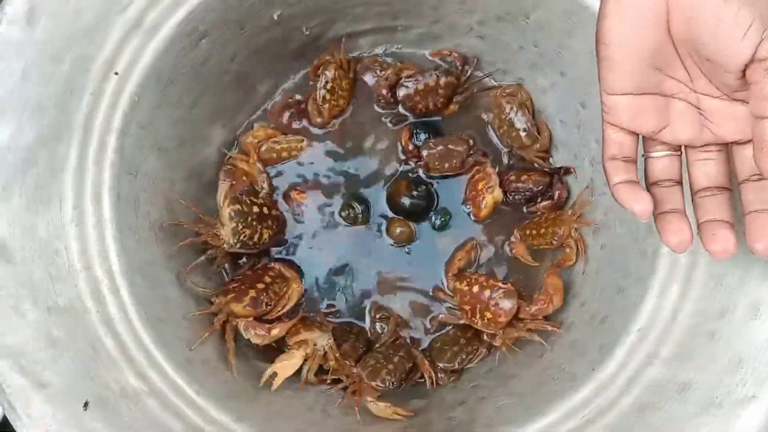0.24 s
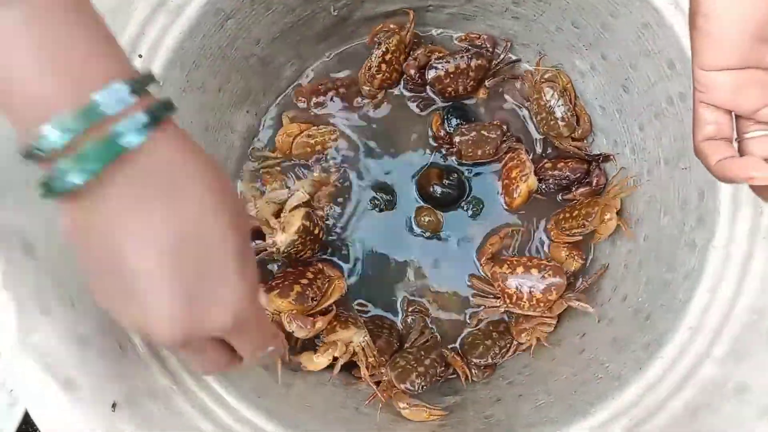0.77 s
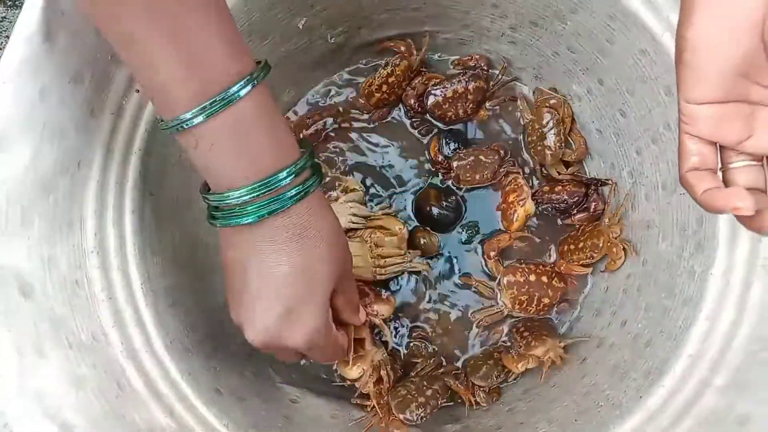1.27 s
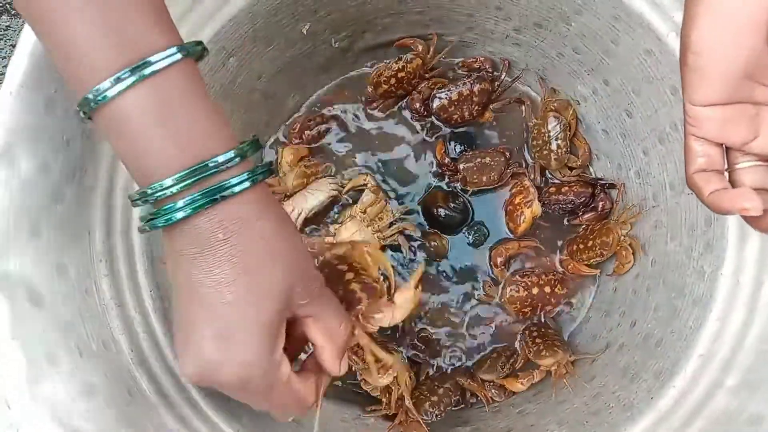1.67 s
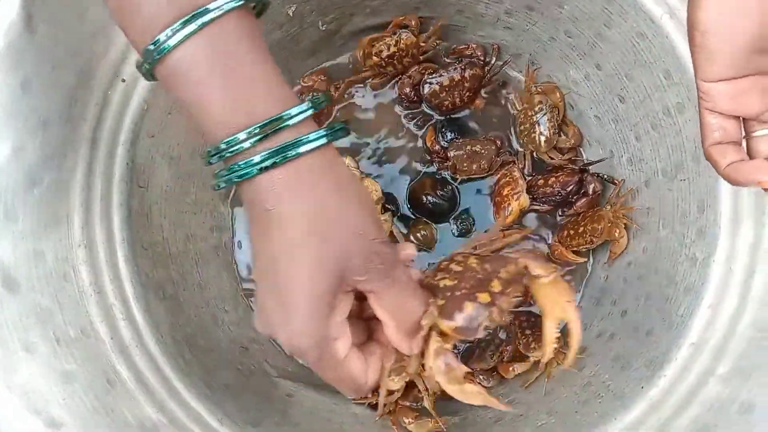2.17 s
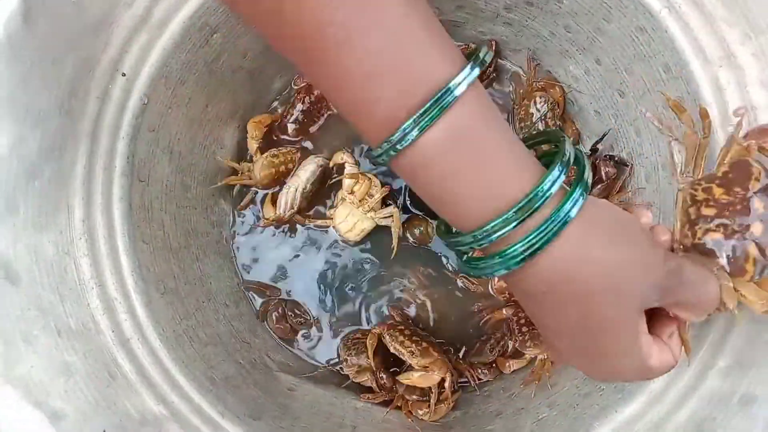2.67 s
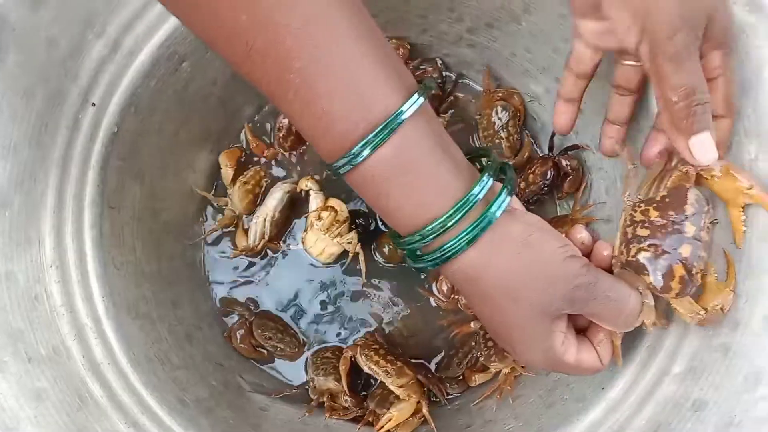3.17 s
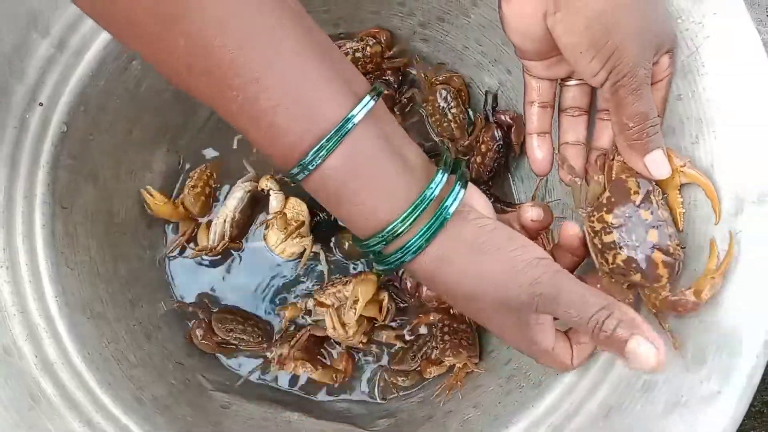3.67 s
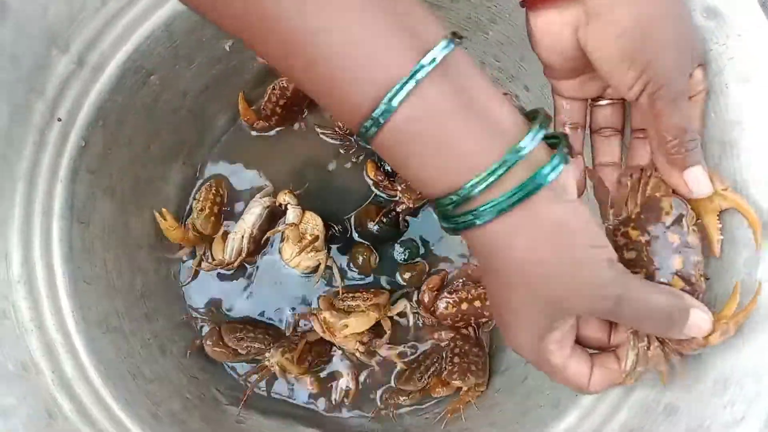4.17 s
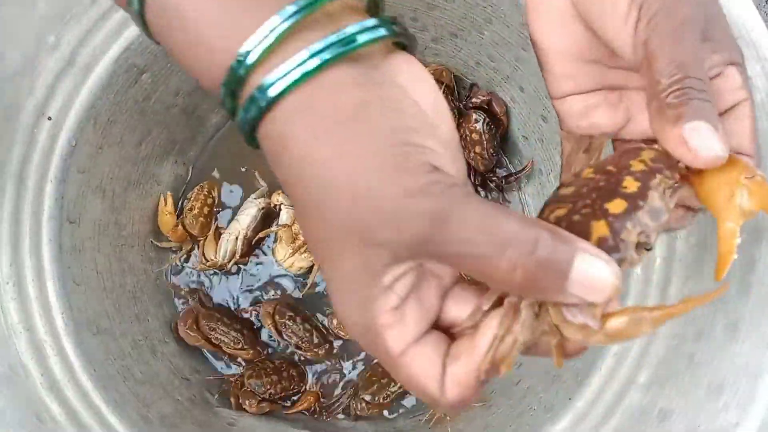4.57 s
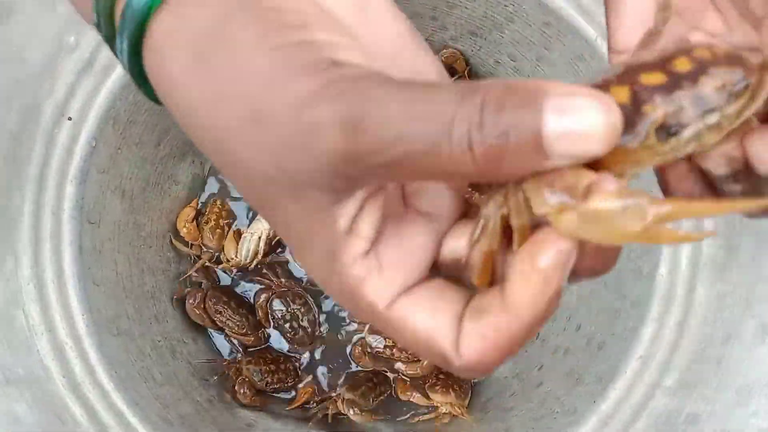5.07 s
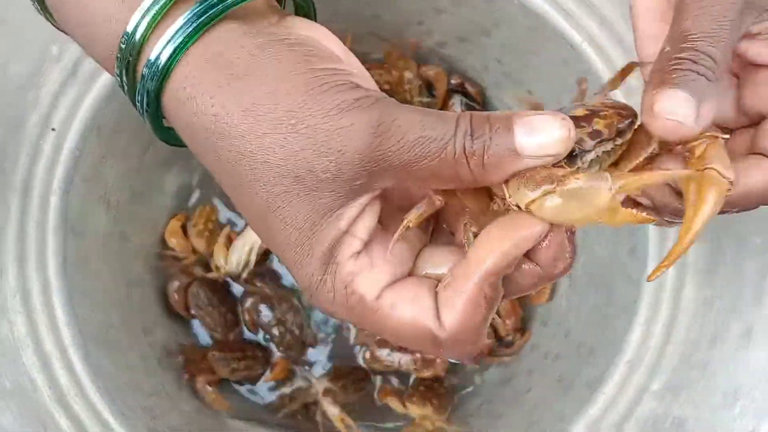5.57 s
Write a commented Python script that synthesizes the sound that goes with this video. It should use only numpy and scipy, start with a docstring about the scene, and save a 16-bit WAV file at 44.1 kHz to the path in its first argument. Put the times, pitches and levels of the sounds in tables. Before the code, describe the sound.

Many live crabs scrabble in a shallow-water metal basin: continuous fine ticking and scratching, with irregular hard claw and shell knocks that ring briefly. Around one to two seconds a hand stirs the water, giving hollow slosh and low plops; afterwards the clatter dominates. Close small microphone above, brushed by soft low air puffs, over very faint hiss with little room echo.

```python
"""Crabs in a metal basin

Live crabs scrabble in shallow water: leg ticks, scrapes and harder claw and shell knocks are noise
bursts and dying sines coloured by the basin wall. Plops, fizz and short wall notes are sines that
climb slightly in pitch. Water sloshing round a hand is noise ringing in the basin's hollow; puffs of
air on a small microphone held above are lumpy low noise, over a faint steady hiss.
"""
import sys
import numpy as np
from scipy import signal
from scipy.io import wavfile
from scipy.ndimage import uniform_filter1d, minimum_filter1d

SR = 44100
rng = np.random.default_rng(int(sys.argv[2]) if len(sys.argv) > 2 else 0)


def volts_from_db(level):
    """Convert decibel levels to linear amplitude ratios."""
    exponent = np.asarray(level, float) / 20
    return 10 ** exponent


def store_wav(level_fs):
    """Save 16-bit WAV to argv[1]."""
    pcm = np.round(np.clip(np.atleast_2d(level_fs), -1, 1) * 32767)
    wavfile.write(sys.argv[1], SR, pcm.T.astype(np.int16))


N = 257103  # length in samples

# long modes of the basin wall, before random detuning: pitch_hz [Hz], level_db [dB], t60_s [s]
WALL_MODES = [(678, -13, 0.51), (776.6, -2, 0.19), (874, -1.5, 0.27), (1022, 1, 0.21), (1125, -6, 0.12),
              (1281, 3.5, 0.078), (1385, 2.5, 0.11), (1530, 1.5, 0.095)]


def evened(x):
    """Scales a signal to an rms of 1."""
    return x / np.sqrt(np.mean(x ** 2) + 1e-20)


def causal(points, size=4096):
    """Minimum-phase response of energy 1 with the given colour: the sound starts at once, then rings."""
    point_hz, point_db = np.transpose(points)
    hz = abs(np.fft.fftfreq(size, 1 / SR))
    colour_db = np.interp(np.log(hz + 1), np.log(point_hz + 1), point_db)
    log_gain = np.log(volts_from_db(np.maximum(colour_db, -70)))
    # the Hilbert transform of the log gain gives the minimum phase
    taps = np.fft.ifft(np.exp(log_gain - 1j * signal.hilbert(log_gain).imag)).real[:size // 2]
    return taps / np.linalg.norm(taps)


def add(mix, start_s, sound):
    """Mixes a sound in at its start time, cut off at the end of the mix."""
    part = mix[:, round(start_s * SR):][:, :sound.shape[1]]
    part += sound[:, :part.shape[1]]


def rattle(t60, rise_s, count=6000):
    """A blow scatters round the wall: dense noise that starts fast and dies away."""
    t = np.arange(count) / SR
    return rng.standard_normal(count) * (1 - np.exp(-t / rise_s)) * volts_from_db(-60 * t / t60)


def basin(drive):
    """The wall colours each of the low, middle and high drives with its own resonant response."""
    # wall colour in three parts: frequency_hz [Hz], level_db [dB per Hz, relative]
    low_colour = [(290, -54), (500, -21), (720, -9.5), (1040, 1), (1640, -2), (1900, 2), (2470, -12),
                  (4180, -120)]
    mid_colour = [(1060, -68), (1800, -10), (2240, -6), (2500, 1), (2680, 1.5), (3280, -3), (3910, -14.5),
                  (4300, -16), (5590, -75), (9460, -120)]
    high_colour = [(2470, -87), (4300, -8), (5000, -1.5), (6010, -0.5), (6930, -2.5), (9040, -18),
                   (10200, -12), (12900, -21), (15400, -16.5)]
    colours = (low_colour, mid_colour, high_colour)
    return sum(signal.oaconvolve(x, causal(c))[:N] for x, c in zip(drive, colours))


def with_ring(tail, ring, ring_db):
    """Adds a ring to a rattle, at a level relative to the rattle's energy."""
    return tail + volts_from_db(ring_db) * ring * np.linalg.norm(tail) / np.linalg.norm(ring)


def spotted(tail, lo_hz, hi_hz, t60, ring_db, count):
    """Adds the few modes that happen to be strong at the spot struck."""
    t = np.arange(len(tail)) / SR
    place, phase = rng.random((2, count, 1))
    hz = lo_hz * (hi_hz / lo_hz) ** place
    rings = np.sin(2 * np.pi * (hz * t + phase)).sum(0)
    rings = rings * volts_from_db(-60 * t / t60)
    return with_ring(tail, rings, ring_db)


def wall_note(tail, mode, ring_db):
    """Adds one long mode of the wall, detuned a little at random."""
    hz, mode_db, t60 = mode
    t = np.arange(len(tail)) / SR
    detune = rng.uniform(0.98, 1.03)
    ring = np.sin(2 * np.pi * hz * detune * t) * volts_from_db(-60 * t / t60)
    return with_ring(tail, ring, ring_db + mode_db)


def rising_notes(rows, glide, rise_s):
    """Each note is a dying sine whose pitch climbs a little; used for bubbles, plops and wall notes."""
    out, t = np.zeros((1, N)), np.arange(SR // 4) / SR
    for start_s, db, hz, t60 in rows:
        shape = (1 - np.exp(-t / rise_s)) * volts_from_db(db - 60 * t / np.clip(t60, 0.015, 0.4))
        # the pitch climbs by twice glide, as a share of its start, per second
        note = np.sin(2 * np.pi * hz * t * (1 + glide * t))
        add(out, start_s, (shape * note)[None])
    return out[0]


def activity():
    """Slow level of the legs in dB, which dips briefly as they ease off."""
    # how busy the legs on the wall are: time_s [s], level_db [dB]
    busy_levels = [(0, -25.5), (.3, -30), (.55, -24.5), (.82, -24.5), (1.25, -25.5), (1.9, -26.5),
                   (2.15, -26), (2.42, -28), (2.68, -28.5), (2.95, -28.5), (3.15, -24.5), (3.45, -28.5),
                   (3.65, -23), (4.0, -26), (4.5, -24), (4.75, -23.5), (5.2, -24.5), (5.83, -25)]
    # brief dips as the legs ease off: middle_s [s], depth_db [dB], half_length_s [s]
    pauses = [(0.123, -5, 0.053), (0.344, -0.5, 0.026), (1.552, -3, 0.017), (2.31, -1, 0.012),
              (2.807, -3.5, 0.046), (3.269, -3, 0.014), (4.167, -4, 0.046), (5.061, -4, 0.0089),
              (5.468, -6, 0.006), (5.677, -3, .025)]
    t = np.arange(N) / SR
    time_s, level_db = np.transpose(busy_levels)
    dips = sum(db * np.exp(-((t - s) / half) ** 4) for s, db, half in pauses)
    return np.interp(t, time_s, level_db) + dips


def room():
    """Faint steady hiss: noise through a fixed colour."""
    # hiss colour: frequency_hz [Hz], level_db [dB per Hz, relative]
    hiss_colour = [(18, -76), (30, -39.5), (1630, -7), (2680, 5), (4190, -12.5), (6380, -2), (16000, -33.5)]
    return volts_from_db(-35) * signal.oaconvolve(rng.standard_normal(N), causal(hiss_colour))[:N]


def puffs_of_air(lumps):
    """Air brushing the microphone: low noise of lumpy level that swells with each puff."""
    # colour of the puffs: frequency_hz [Hz], level_db [dB per Hz, relative]
    puff_colour = [(15, -56), (40, -28), (75, 0.5), (140, -7), (230, -16.5), (350, -21), (480, -71)]
    # puffs: middle_s [s], level_db [dB], half_length_s [s]
    puff_times = [(0.015, -48, 0.032), (0.294, -31, 0.021), (0.88, -42.5, 0.056), (1.12, -55, 0.14),
                  (1.312, -36.5, 0.077), (1.75, -28.5, 0.03), (2.043, -32, 0.018), (2.455, -62, 0.068),
                  (2.798, -45, 0.047), (3.98, -51, 0.065), (4.203, -52.5, 0.096), (4.352, -60.5, 0.074),
                  (4.533, -62.5, 0.1)]
    t = np.arange(N) / SR
    lumpy = rng.standard_normal(N) * volts_from_db(3.0 * lumps)
    puff = signal.oaconvolve(lumpy, causal(puff_colour, size=16384))[:N]
    swells = sum(volts_from_db(db) * np.exp(-((t - s) / half) ** 2) for s, db, half in puff_times)
    return (volts_from_db(-66.5) + swells) * evened(puff)


def sloshing(lumps):
    """Water slaps stir the basin's hollow: lumpy noise bursts ring its low air and water modes."""
    # slaps: start_s [s], level_db [dB]
    slaps = [(0.876, -41), (1.04, -38.5), (1.098, -40), (1.169, -32), (1.284, -29), (1.359, -31),
             (1.425, -39), (1.485, -35.5), (1.58, -36), (1.779, -35), (1.925, -45.5), (2.37, -41.5),
             (2.479, -46), (2.574, -53), (3.315, -56), (3.709, -40.5), (3.782, -48), (4.316, -53),
             (4.44, -48), (4.484, -45), (4.707, -49), (4.851, -43), (4.938, -41.5), (5.121, -50),
             (5.219, -59), (5.397, -44.5)]
    # modes of air and water: pitch_hz [Hz], width_hz [Hz, widened 1.5 times below], level_db [dB]
    hollow_modes = [(304, 34, -25), (344.6, 67, 21.5), (696, 147, 26)]
    rise_s, t60_s, calm_db = 0.0041, 0.35, -64.5
    water, t = np.full((1, N), volts_from_db(calm_db)), np.arange(SR // 2) / SR
    for start_s, db in slaps:
        add(water, start_s, ((1 - np.exp(-t / rise_s)) * volts_from_db(db - 60 * t / t60_s))[None])
    # the puffs' lumps, shifted by half the length
    stir = rng.standard_normal(N) * water[0] * volts_from_db(0.93 * np.roll(lumps, N // 2))
    t = t[:SR // 8]
    ring = sum(volts_from_db(db) * t * np.exp(-np.pi * width * 1.5 * t) * np.sin(2 * np.pi * hz * t)
               for hz, width, db in hollow_modes)
    return signal.oaconvolve(stir, ring / np.linalg.norm(ring))[:N]


def air_and_water():
    """Puffs and sloshing, both made uneven by one slow random curve."""
    lumps = evened(uniform_filter1d(rng.standard_normal(N), size=600))
    return puffs_of_air(lumps) + sloshing(lumps)


def plops_and_wall_notes():
    """Low plops in the water below 350 Hz, and short higher notes of the ringing wall."""
    # plops and wall notes: start_s [s], level_db [dB], pitch_hz [Hz at the start]
    note_rows = [(0.742, -17.5, 960), (1.211, -22, 297), (1.328, -15, 331), (1.655, -15.5, 1320),
                 (1.672, -15, 287), (1.726, -13.5, 268), (1.733, -16, 147), (2.043, -21.5, 1038),
                 (2.187, -27, 1290), (3.917, -18, 1110), (4.39, -31, 1300), (2.865, -26, 1234),
                 (4.172, -23, 815), (5.128, -43, 800), (2.95, -27.5, 1030), (2.612, -33, 1270),
                 (4.654, -21, 1470)]
    t60_s = 0.073
    return rising_notes([(*row, t60_s) for row in note_rows], glide=0.61, rise_s=0.0011)


def fizz():
    """Small bubbles stirred up at random, each with its own note, louder when the legs are busy."""
    bubbles_per_s, lo_hz, hi_hz = 28, 741.7, 1615
    when, size, pitch, life = rng.random((round(bubbles_per_s * N / SR), 4)).T
    hz = lo_hz * (hi_hz / lo_hz) ** pitch
    db = activity()[(when * N).astype(int)] - 10 + 9 * size ** 2
    t60_s = 0.13 * (0.2 + life)
    return rising_notes(zip(when * N / SR, db, hz, t60_s), glide=0.24, rise_s=0.0053)


def tips():
    """Leg tips tick the wall: short dry treble, some ticks placed, others random and louder with activity."""
    # placed ticks: start_s [s], level_db [dB]
    placed_ticks = [(0.683, -22), (0.9102, -12), (1.035, -21), (1.354, -22), (1.494, -17), (2.6617, -17.5),
                    (3.2206, -13), (3.6017, -20.5), (3.959, -18), (4.422, -14.5), (5.088, -15.5),
                    (5.1856, -17), (5.3862, -19.5)]
    ticks_per_s = 60
    size_db = 2.14 * np.minimum(rng.exponential(1, N), 3)
    train = volts_from_db(activity() - 8.5 + size_db) * (rng.random(N) < ticks_per_s / SR)
    for start_s, db in placed_ticks:
        train[round(start_s * SR)] = volts_from_db(db)
    kind = rng.integers(0, 6, N)  # six different tick sounds
    ticks = sum(signal.oaconvolve(train * (kind == k), rattle(0.036, 0.00063, count=2000))[:N]
                for k in range(6))
    return signal.oaconvolve(ticks, causal([(3000, -19.5), (6000, 21.0), (15500, 9.0)]))[:N]


def scrapes():
    """A shell dragged along the wall: gritty noise that starts quickly, holds as it slides, then rings out."""
    # scrapes: start_s [s], level_db [dB], length_s [s]
    scrape_rows = [(0.8, -21, 0.032), (0.834, -22.5, 0.038), (0.984, -26, 0.013), (1.62, -23, 0.037),
                   (1.841, -29, 0.025), (2.08, -27, 0.091), (2.182, -27.5, 0.045), (3.284, -25, 0.054),
                   (3.694, -27.5, 0.072), (3.942, -23, 0.021), (4.057, -22, 0.014), (4.199, -32, 0.05),
                   (4.663, -23.5, 0.062), (4.839, -23.5, 0.025), (5.009, -21, 0.015)]
    rise_s, t60_s = 0.0013, 0.12
    balance = volts_from_db(np.array([[-12], [0], [-7]]))  # low, middle, high
    drive, t = np.zeros((3, N)), np.arange(9000) / SR
    for start_s, db, length_s in scrape_rows:
        shape = (1 - np.exp(-t / rise_s)) * volts_from_db(db - 60 * np.maximum(t - length_s, 0) / t60_s)
        grit = volts_from_db(2.7 * evened(uniform_filter1d(rng.standard_normal(len(t)), size=200)))
        add(drive, start_s, balance * shape * grit * rng.standard_normal((3, len(t))))
    return basin(drive)


def legs():
    """Random ticks of many sizes, in flurries; each crab stays a moment on one spot with its own ring."""
    ticks_per_s, moves_per_s, crabs, spots = 800, 40, 4, 24
    flurry = evened(uniform_filter1d(uniform_filter1d(rng.standard_normal(N), size=500), size=500))
    struck = rng.random(N) < ticks_per_s / SR
    size = volts_from_db(2.85 * np.minimum(rng.exponential(1, N), 4) + 0.21 * flurry) * struck
    # every crab shifts its hold at random; each tick belongs to a random crab
    moves = np.cumsum(rng.random((crabs, N)) < moves_per_s / SR, axis=1)
    holds = rng.integers(0, spots, (crabs, 400))
    crab = rng.integers(0, crabs, N)
    spot = holds[crab, moves[crab, np.arange(N)]]
    drive = np.zeros((3, N))
    for k in range(spots):
        lean_db = np.array([3.1, 1.4, 1.6]) * rng.standard_normal(3)
        low = wall_note(rattle(0.07, 0.006), WALL_MODES[k % len(WALL_MODES)], -11.5)
        mid = spotted(rattle(0.052, 0.00029), 1901, 4000, 0.15, -15.5, count=3)
        high = spotted(rattle(0.062, 0.00013), 4492, 12990, 0.049, -8.5, count=4)
        for part, tail, db in zip(drive, (low, mid, high), lean_db):
            part += volts_from_db(db) * signal.oaconvolve(size * (spot == k), tail)[:N]
    activity_db = activity()
    # the low ring follows activity a little less than fully
    low_db = -39 + 0.97 * (activity_db - activity_db.mean())
    levels = volts_from_db(np.array([low_db, activity_db, activity_db - 4]))
    return basin(levels * np.array([evened(part) for part in drive]))


def struck_wall(t):
    """The wall's long modes after one blow, each at a random strength and slightly sharp."""
    return sum(volts_from_db(6.2 * rng.standard_normal() + ring_db - 60 * t / ring_s)
               * np.sin(2 * np.pi * hz * rng.uniform(1.0, 1.04) * t)
               for hz, ring_db, ring_s in WALL_MODES)


def knocks():
    """Claws and shells hit the wall: a sharp crack and a longer rattle; lows linger, treble dies sooner."""
    # knocks: start_s [s], level_db [dB], weight_db [dB in the low ring], sharpness_db [dB in the treble],
    # note_hz [Hz; 0 is none, values of a few Hz give only a slow swing too low to hear as a note]
    knock_rows = [(0.1818, -13.5, -24, -0.5, 2), (0.2245, 0.5, -17, -9, 1156), (0.283, -9.5, -18, -5, 0),
                  (0.387, 2.5, -8.5, -15.5, 1522), (0.484, -12, -9, -8, 1),
                  (0.4907, -3.5, -11.5, -11.5, 1470), (0.692, -2.5, -10, -8, 1541),
                  (0.875, -8.5, -2.5, -2, 1036), (0.9105, -8.5, -25, -6, 0), (1.094, -11.5, -22, -7, 0),
                  (1.1717, -6, -15, -13, 1), (1.2001, -13.5, -0.5, 0.5, 1176),
                  (1.4546, -10.5, -2, -12, 1156), (1.565, -9.5, -24, -22, 4), (1.6722, -14.5, -0.5, 5, -3),
                  (1.7653, -7.5, -6, -9, 0), (1.939, -12, -10, -12, 1397), (2.2502, -9.5, -34, -7, 4),
                  (2.32, 2, -16, -11, 1219), (2.4758, -6.5, -15.5, -8.5, 3), (2.5335, -7, -15, -21, 1.5),
                  (2.5978, -9.5, -19, -28, 0), (2.6925, -9, -35, -10, -4), (2.7168, 7, -8.5, -9, 1399),
                  (2.745, -15.5, -2, -20, 848), (2.8474, -10.5, -35, -7, 2), (3.0851, -9, -8.5, -1.5, -0.5),
                  (3.1185, -4, -38, -12.5, 2), (3.215, -5, -15.5, -3, -0.5), (3.3132, -2, -6, -10.5, 1344),
                  (3.3566, 7.5, -15, -9, 1042), (3.561, -17.5, -1, -24, 1494),
                  (3.7399, -10.5, -6.5, -4, -1), (3.8388, 1.5, -11.5, -12.5, 1373),
                  (3.8899, -8.5, -5.5, -6.5, 1367), (4.0929, -8.5, -10.5, -15, 867),
                  (4.2263, -1.5, -15.5, -14.5, 1044), (4.3221, -10.5, -9.5, -19, 1),
                  (4.379, -17, -6.5, -5, -1.5), (4.47, 0, -13, -1.5, 1234), (4.5573, -16.5, -63, 6, -15),
                  (4.8989, -4, -10, -10, 0), (5.069, -2.5, -19, -8.5, 3), (5.131, -8, -30, -9, 0),
                  (5.4483, -12, -10, -0.5, 0), (5.6965, -12, -10, 0.5, -0.5),
                  (5.817, -3, -6.5, -13.5, -1.5)]
    drive, notes, t = np.zeros((3, N)), [], np.arange(6000) / SR
    for start_s, db, weight_db, sharp_db, note_hz in knock_rows:
        t60 = 0.088 * volts_from_db(-0.12 * db)  # softer knocks rattle longer
        low = volts_from_db(weight_db - 12.0) * (rattle(2.3 * t60, 0.00089) + volts_from_db(-23) * struck_wall(t))
        mid = volts_from_db(-12.5) * rattle(t60, 0.00022) + volts_from_db(-9.0) * rattle(0.028, 0.00011)
        high = volts_from_db(sharp_db - 4.0) * rattle(0.52 * t60, 0.00029)
        add(drive, start_s, volts_from_db(db) * np.array([low, mid, high]))
        if note_hz:
            notes.append((start_s, db + weight_db - 4.5, note_hz, 0.075))
    return basin(drive) + rising_notes(notes, glide=0.46, rise_s=0.0015)


def band_notch(x):
    """A fixed dip near 4.2 kHz in the colour: part of one band is taken away."""
    notch_hz, width_hz, share = 4244, 670, 0.44
    band = signal.lfilter(*signal.iirpeak(notch_hz, notch_hz / width_hz, SR), x)
    return x - share * band


def scene():
    """Crabs and hiss with the dip in their colour, then the plops, wall notes, water and air without it."""
    crabs = knocks() + scrapes() + legs() + tips() + room()
    return (band_notch(crabs) + plops_and_wall_notes() + fizz() + air_and_water())[None]


def suppress_noise(x):
    """Lowers each frequency bin while its smoothed power is near its usual floor."""
    z = signal.stft(x, nperseg=1024, noverlap=768)[2]
    power = uniform_filter1d(uniform_filter1d(abs(z) ** 2, size=5, axis=1), size=4, axis=2)
    power_db = 10 * np.log10(abs(power) + 1e-16)
    over_db = power_db - np.percentile(power_db, 20, axis=2, keepdims=True)
    gain = volts_from_db(-4.5 * np.clip(1 - over_db / 6, 0, 1.5))
    return signal.istft(z * gain, nperseg=1024, noverlap=768)[1][:, :N]


def limit(x):
    """Turns the loudest knocks down towards a ceiling, over windows of about 4 ms."""
    ceiling_db, window = -2.5, 177
    peak = -minimum_filter1d(-abs(x), size=window, axis=1)
    gain = np.minimum(1, volts_from_db(ceiling_db) / (peak + 1e-9))
    return x * uniform_filter1d(gain, size=window, axis=1)


def band_limit(x):
    """A steep low-pass at the top of the band."""
    return signal.sosfilt(signal.butter(12, 16660, fs=SR, output="sos"), x)


def record(dry):
    """A noise suppressor, a limiter, then a steep treble cut."""
    limited = limit(suppress_noise(dry))
    edge_hz = 15750
    edge = signal.firwin(255, edge_hz, window=("kaiser", 5), fs=SR)
    finished = signal.oaconvolve(limited, edge[None], "same")
    return band_limit(finished)


dry = scene()
out = record(dry)
store_wav(out)
```